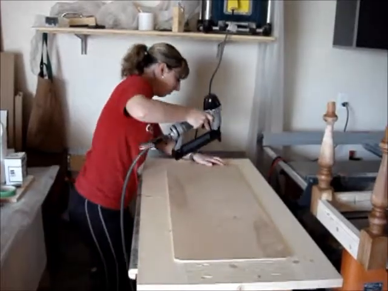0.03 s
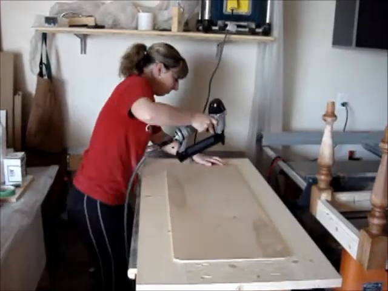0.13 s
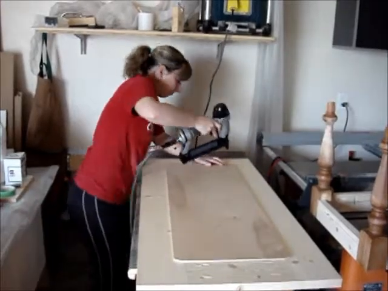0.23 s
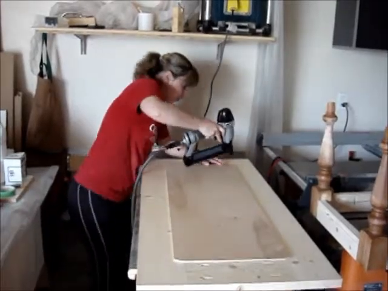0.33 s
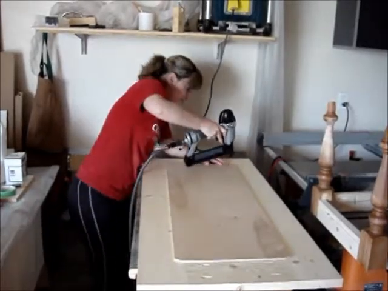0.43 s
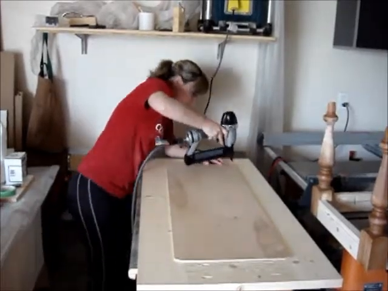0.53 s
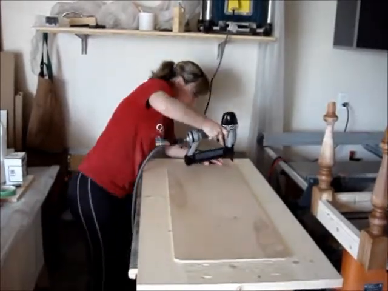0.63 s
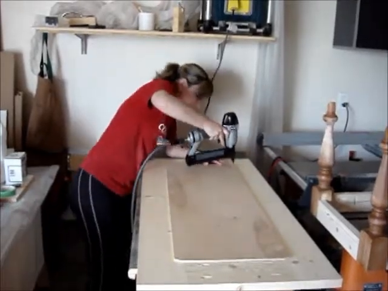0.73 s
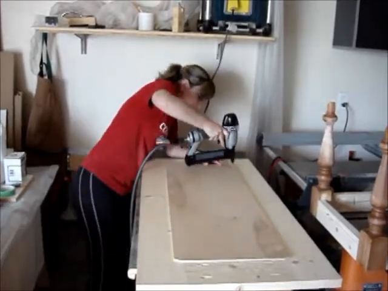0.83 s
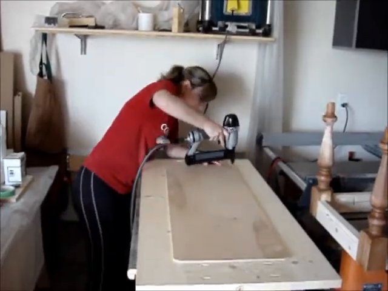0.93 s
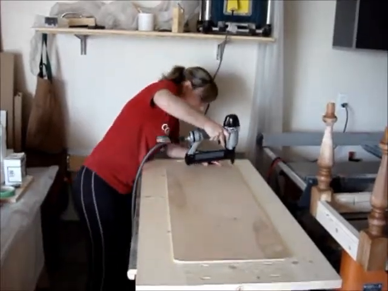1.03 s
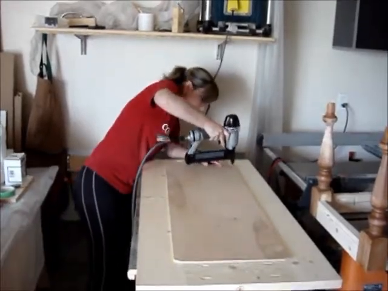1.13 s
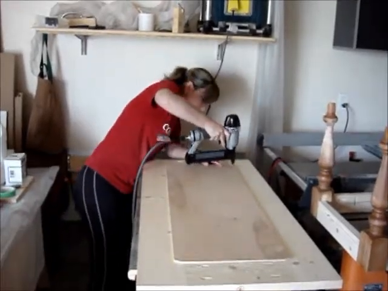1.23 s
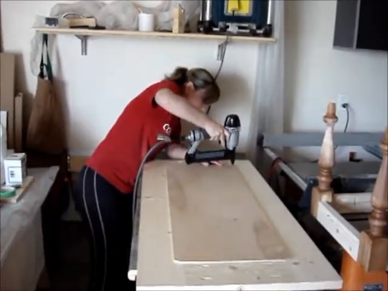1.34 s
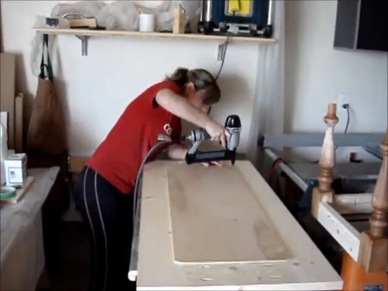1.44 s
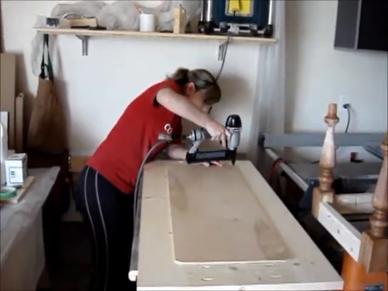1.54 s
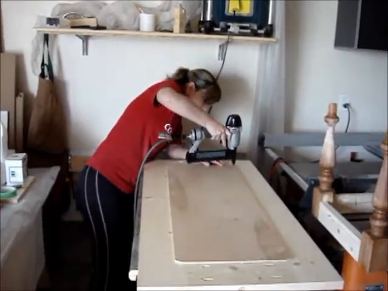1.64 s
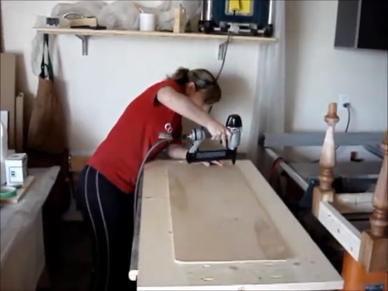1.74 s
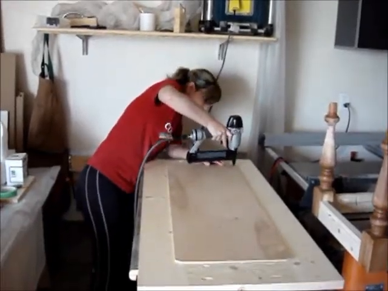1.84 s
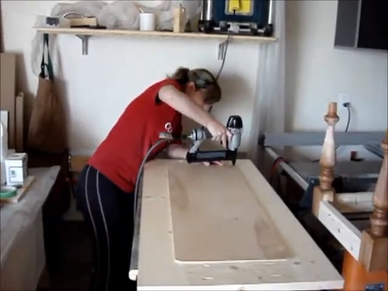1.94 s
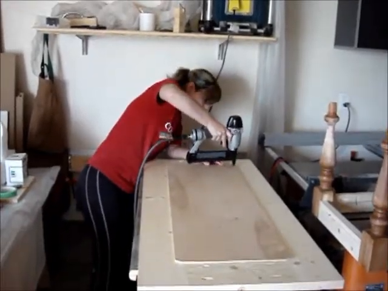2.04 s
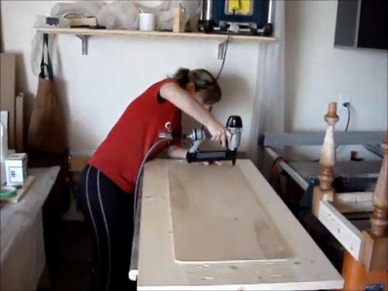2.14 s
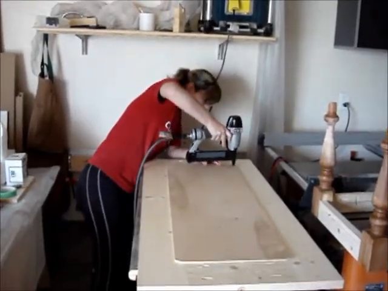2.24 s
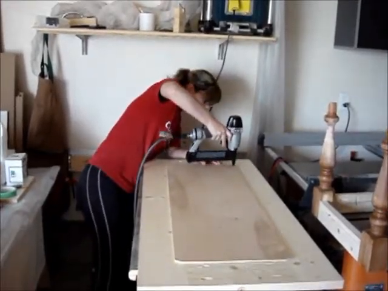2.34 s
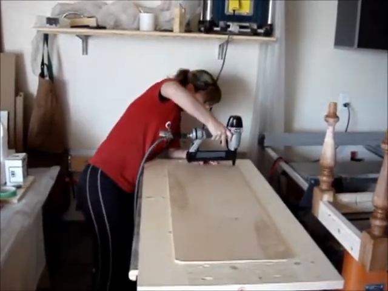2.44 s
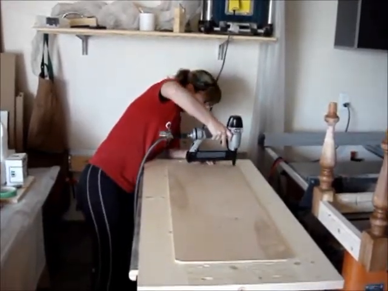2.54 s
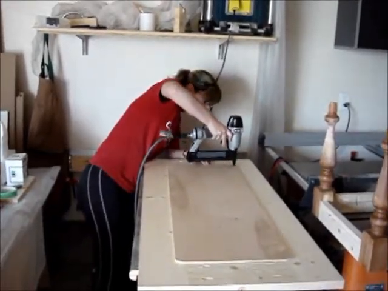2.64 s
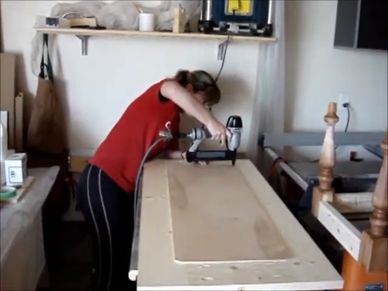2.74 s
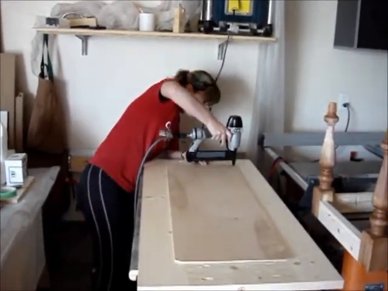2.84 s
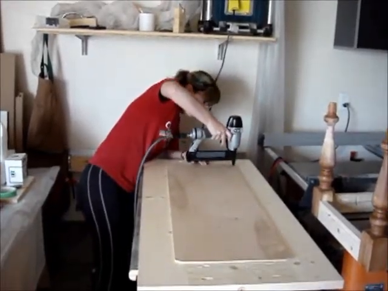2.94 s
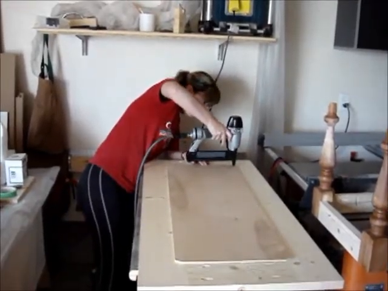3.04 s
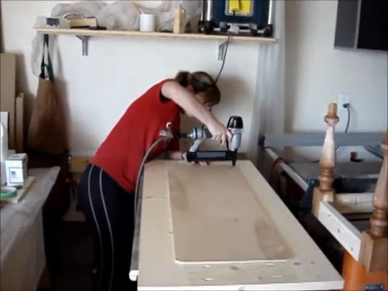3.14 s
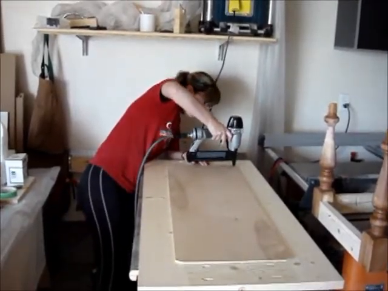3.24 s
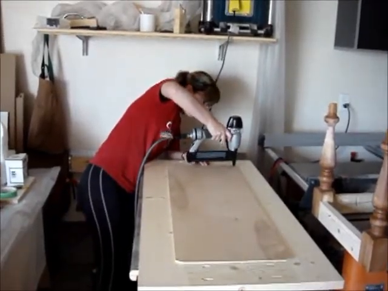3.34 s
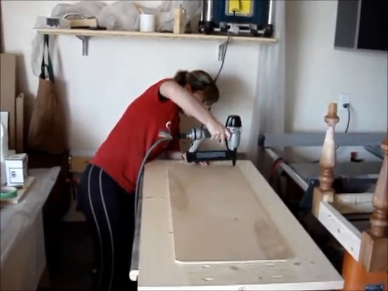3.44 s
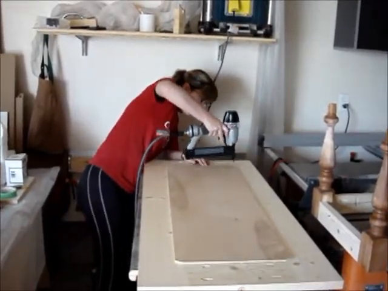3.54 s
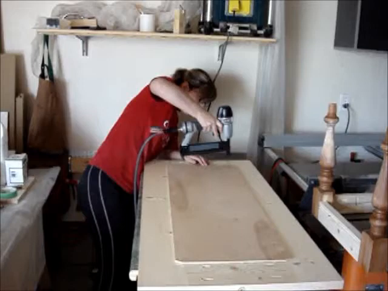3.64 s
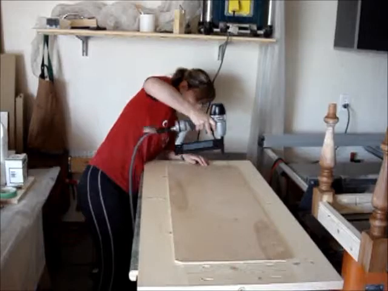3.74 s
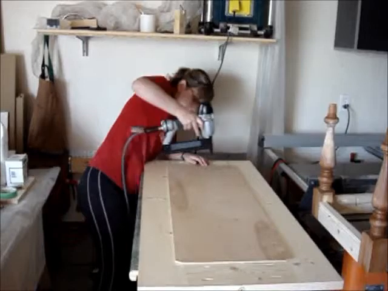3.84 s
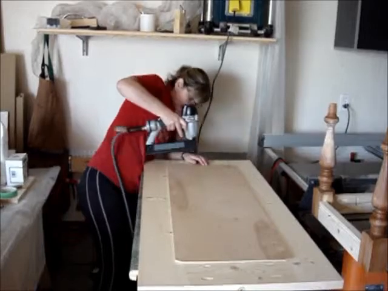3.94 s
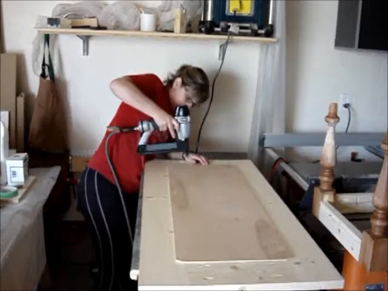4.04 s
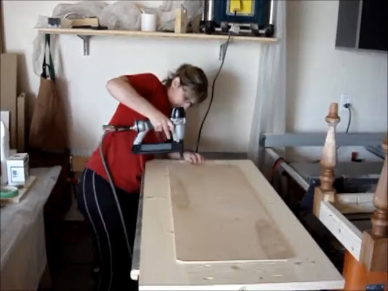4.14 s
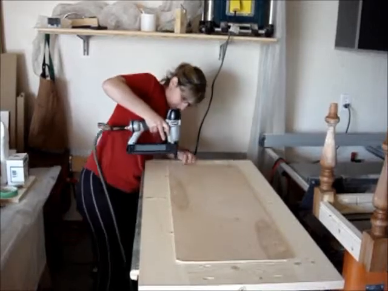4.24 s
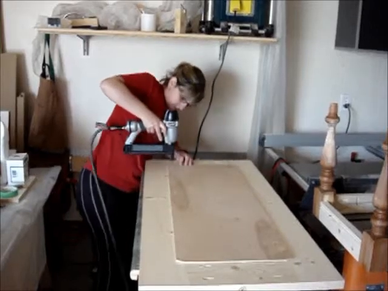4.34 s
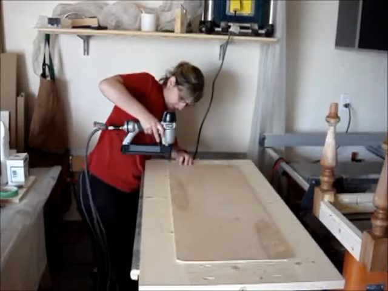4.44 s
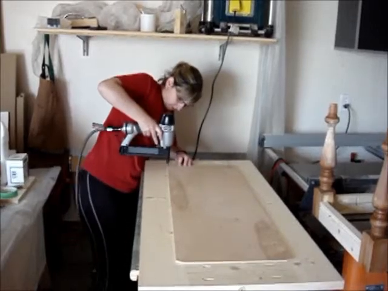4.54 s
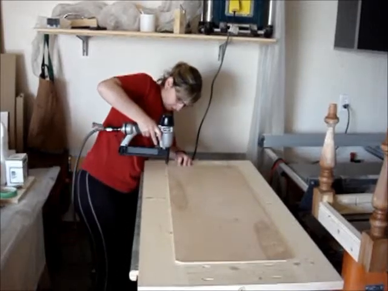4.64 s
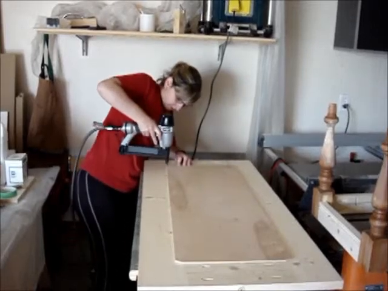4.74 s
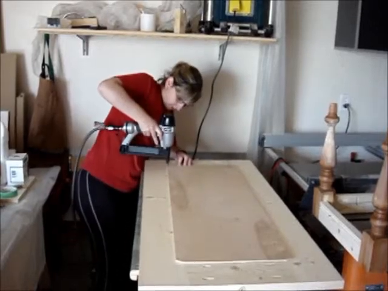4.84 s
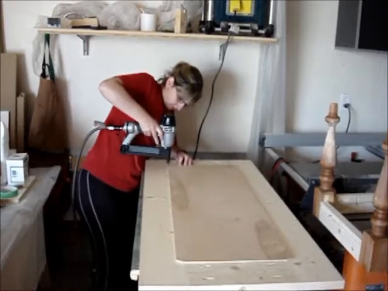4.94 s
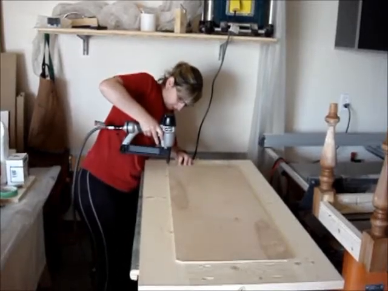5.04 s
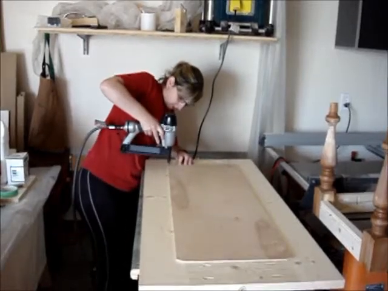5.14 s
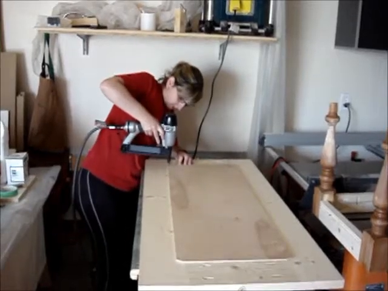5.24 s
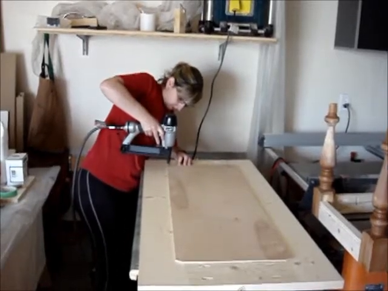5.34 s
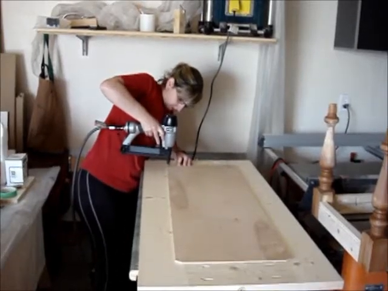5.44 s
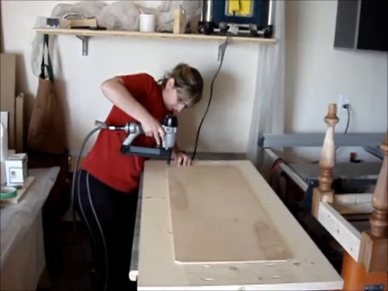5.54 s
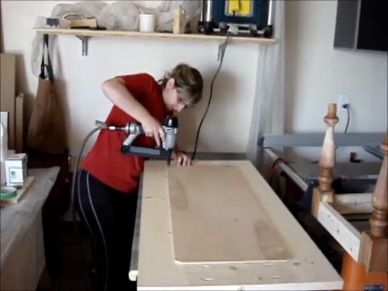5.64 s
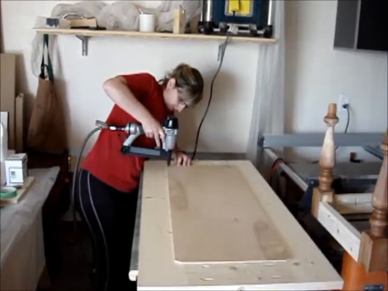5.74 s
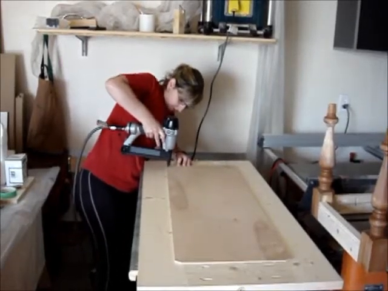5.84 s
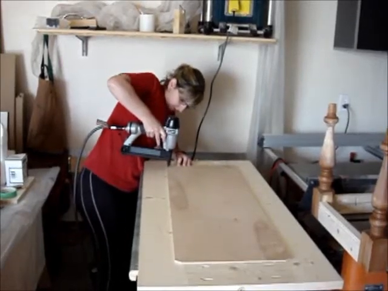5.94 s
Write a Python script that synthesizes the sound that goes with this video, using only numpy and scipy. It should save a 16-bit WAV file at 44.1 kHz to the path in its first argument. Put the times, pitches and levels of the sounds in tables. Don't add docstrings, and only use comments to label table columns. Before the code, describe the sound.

In a bare workshop, a hand and pneumatic stapler drag, knock and clack over a wooden board, with brief skin squeaks and hose hums. After a quiet moment, a puff of air leads into one huge cracking shot, with a short exhaust burst and room ring. Faint handling and small knocks follow over low machine hum. A small camera overloads slightly on the bang.

```python
import sys
import numpy as np
from scipy import signal
from scipy.io import wavfile
from scipy.ndimage import uniform_filter1d, minimum_filter1d

SR = 44100
rng = np.random.default_rng(int(sys.argv[2]) if len(sys.argv) > 2 else 0)


def undo_db(level):
    steps = np.asarray(level, float) / 20
    return 10 ** steps


def master_out(mix):
    frames = np.transpose(np.atleast_2d(mix))
    ceiling = np.clip(frames, -1, 1)
    pcm = np.round(ceiling * 32767).astype(np.int16)
    wavfile.write(sys.argv[1], SR, pcm)


N = 264326

# freq_hz, level_db (per Hz)
HUM_COLOUR = [(12, -63), (20, -28), (43, -20.5), (63, -3), (130, -0.5), (178, -16), (213, -2), (419, -5),
              (824, 1), (1100, -2.5), (4350, -21.5), (7510, -20), (10000, -25.5), (13000, -97),
              (22000, -120)]
# peak_s, level_db, rise_s, fall_s
FOCUS_RUNS = [
    (4.027, -55, .05, .02),
    (4.3, -68, 1.5, 1.5),
    (4.72, -57, .35, .3),
    (4.9, -60, .6, .15),
    (5.14, -57, .2, .05),
    (5.162, -50, .04, .005),
]
# freq_hz, width_hz, level_db
LENS_MODES = [(4350, 850, 0), (6050, 700, -3), (8200, 600, -16)]
# freq_hz, width_hz, level_db
WHINE = (7410, 40, -74)

# peak_s, drum_db, rustle_db, length_s
DRAGS = [(0.0, -38.5, -52.5, 0.17), (0.068, -50, -35.5, .12), (0.2, -48.5, -42.5, 0.25),
         (0.362, -44.5, -48.5, 0.22), (0.544, -51.5, -45, 0.6), (0.793, -44, -43.5, 0.35),
         (1.045, -39.5, -43.5, 0.11), (1.204, -52.5, -78, 0.35), (1.804, -61, -71, .15),
         (1.933, -44.5, -65, 0.28), (2.07, -41, -64, 0.17), (2.24, -54, -59, 0.22),
         (2.377, -49.5, -58, 0.55), (2.57, -60, -55, .2), (2.787, -75, -64, 0.47), (3.193, -68, -67, .3),
         (4.112, -74, -60.5, 0.7), (4.417, -61, -72, 0.28), (4.607, -60, -71, 0.26),
         (4.856, -55.5, -62, 0.77), (5.11, -53, -65, 0.36), (5.375, -57, -70, 0.37), (5.57, -51, -79, 0.42),
         (5.75, -52, -61.5, 0.21), (5.926, -49, -67, 0.5)]
# time_s, pitch_hz
GRIP_NOTE = [(0, 365), (.35, 316), (.65, 429), (1.2, 276), (1.92, 332), (2.15, 242), (2.45, 270),
             (2.62, 445), (4.2, 393), (4.9, 333), (5.6, 273), (5.8, 359), (5.99, 250)]
# freq_hz, width_hz, level_db
BOARD_MODES = [(139, 76, -3), (290, 129, 2.5), (501, 48, -6), (717, 100, -7), (990, 203, -7.5),
               (1558, 116, -10)]
# freq_hz, level_db (per Hz)
RUSTLE_COLOUR = [(530, -23), (900, -12.5), (1570, -6), (2460, -7), (3080, -7), (4420, -8.5), (7620, -15.5),
                 (10000, -26), (13000, -57), (22000, -120)]
# peak_s, level_db, rise_s, fall_s, centre_hz
SKIN_SLIDES = [
    (.55, -57, 0.72, 0.74, 4800),
    (.86, -39, 0.35, 0.24, 4260),
    (2.3, -55, .2, 0.4, 4670),
    (2.58, -50, 0.13, 0.26, 4670),
    (2.71, -44, 0.09, 0.13, 5050),
    (2.77, -50, 0.17, 0.047, 4930),
]
# peak_s, level_db, rise_s, fall_s, pitch_hz
SQUEAKS = [
    (.62, -60, 0.2, .2, 4410),
    (.83, -45, 0.37, 0.2, 4340),
    (2.3, -62, .1, .3, 5020),
    (2.58, -61, .1, .2, 4920),
    (2.73, -54, .1, 0.089, 5280),
]
# peak_s, level_db, rise_s, fall_s, pitch_hz
HOSE_RUBS = [
    (.26, -41, 0.035, .1, 727),
    (.34, -46, 0.065, 0.24, 730),
    (.43, -43, 0.11, .06, 715),
    (.81, -42.5, 0.28, 0.29, 760),
    (1.96, -47.5, 0.078, 0.052, 820),
    (2.288, -48, 0.11, 0.053, 667),
    (2.72, -45, 0.15, 0.2, 780),
]
# time_s, level_db, pitch_hz, contact_s
KNOCKS = [(.249, -30.5, 713, 0.02), (.347, -32.5, 325, 0.016), (0.41, -29, 543, 0.034),
          (.553, -32, 270, 0.015), (.768, -30.5, 290, 0.02), (.79, -29.5, 655, 0.073),
          (0.854, -33, 350, 0.0096), (2.02, -36.5, 255, .0091), (2.078, -34.5, 495, 0.042),
          (2.092, -33, 222, .028), (4.093, -31, 860, 0.028), (4.142, -38.5, 518, .018),
          (4.797, -38.5, 313, 0.023), (4.986, -40, 354, 0.032), (3.330, -23.5, 850, 0.0013),
          (5.739, -38.5, 350, 0.064), (5.799, -39, 350, 0.012)]
# time_s, wood_db, metal_db, click_db, wood_pitch_hz
CLACKS = [(0.546, -29.5, -53, -33.5, 960), (1.001, -35, -54, -58, 570), (1.009, -33, -25, -32, 1500),
          (1.036, -35, -25, -24.5, 606), (1.086, -37, -38, -33, 270), (1.199, -40, -35.5, -44, 228),
          (1.776, -41, -41.5, -51, 1500), (1.92, -56, -55, -42, 844), (1.928, -47, -46, -38.5, 820),
          (2.075, -32, -45, -46, 1050), (5.73, -41, -47, -41, 895), (5.868, -51, -45, -41, 900),
          (5.885, -33, -41, -52, 335), (5.911, -37, -44.5, -60, 388), (5.932, -44, -47, -60, 280)]
# freq_hz, width_hz, level_db
MAGAZINE_MODES = [(1500, 120, -7), (2070, 90, -10), (2740, 110, 0), (2910, 150, -2), (3300, 300, -10),
                  (3700, 140, -14), (4680, 140, -16)]

# time_s, level_db
AIR_FLOW = [
    (3.314, -82),
    (3.318, -37),
    (3.322, -57),
    (3.328, -28.5),
    (3.333, -18),
    (3.345, -24),
    (3.39, -29),
    (3.47, -14),
    (3.5, -70),
]
# freq_hz, level_db (per Hz)
AIR_COLOUR = [(530, -53), (900, -31), (995, -16), (1400, -5.5), (1970, -6.5), (2650, 3.5), (3510, 2.5),
              (3960, -0.5), (4790, 1.5), (7390, 3), (10000, -2.5), (13000, -59), (22000, -120)]
# time_s, level_db
BLOWS = [
    (3.3898, -13),
    (3.3908, 1),
    (3.3926, -6),
    (3.3983, -2),
    (3.413, -5.5),
    (3.4226, -11),
    (3.428, -13),
]
# freq_hz, level_db (per Hz)
BLOW_COLOUR = [(35, -56), (60, -31), (151, -17.5), (239, -6), (283, -12), (404, -7), (440, -14.5),
               (509, -1), (577, -5), (1060, -0.5), (1310, -5), (2560, 2), (3970, -8.5), (4320, -8.5),
               (9000, -15), (11700, -41), (19800, -120)]
# freq_hz, width_hz, level_db
STRUCK_MODES = [(500, 25, 0), (907, 38, 13.5), (1050, 110, 11.5), (1500, 72, 13.5), (2030, 44, -22),
                (2630, 58, -2), (2890, 40, 8), (3920, 140, -9.5), (4800, 260, 8)]

# freq_hz, t60_s
ROOM_DECAY = [(60, 0.15), (130, 0.75), (250, 0.55), (700, 0.65), (1400, 0.76), (2500, 0.64), (5000, 0.64),
              (8000, 0.49), (11000, 0.36)]
# delay_s, level_db
WALLS = [
    (.0065, -9),
    (.0195, -8),
    (.030, -8),
    (.0375, -10),
    (.058, -14),
    (.081, -15),
    (.112, -19),
]

# time_s, jump_fullscale, settling_s
JUMPS = [
    (3.334, 0.037, 0.031),
    (3.389, -0.05, 0.028),
]
# time_s, steps_made
GAIN_STEPS = [
    (3.575, 0),
    (3.74, 5),
    (3.895, 9),
    (3.993, 11),
    (4.065, 12),
    (4.31, 12),
    (4.94, 28),
]
# time_s, offset_fullscale
DRIFT = [
    (3.45, 0),
    (3.51, .003),
    (3.6, .001),
    (4.0, .0002),
    (4.3, 0),
    (4.5, -.003),
    (4.9, -.003),
    (5.0, 0),
]
# peak_s, level_db, rise_s, fall_s
TABLE_BUMPS = [
    (.65, -53, 0.078, 0.033),
    (.85, -62, .1, 0.092),
]

BOARD_BAND = signal.butter(2, [110, 1500], "band", fs=SR, output="sos")


def evened(x):
    return x / np.sqrt(np.mean(x ** 2) + 1e-20)


def read(points, hz):
    f, value = np.transpose(points)
    return np.interp(np.log(hz + 1), np.log(f + 1), value)


def add(mix, s, sound):
    part = mix[round(s * SR):][:len(sound)]
    part += sound[:len(part)]


def swells(rows):
    s, db, rise, fall = np.transpose(rows)[:4, :, None]
    late = np.arange(0, N, 32) / SR - s
    lateness = np.maximum(-late / np.maximum(rise, 1e-3), late / np.maximum(fall, 1e-3))
    gain = undo_db(db - 20 * lateness)
    return np.repeat(np.sqrt((gain ** 2).sum(0)), 32)[:N]


def glide(rows):
    return np.interp(np.arange(N) / SR, *np.transpose(rows)[[0, -1]])


def resonate(x, hz, width):
    turn = np.exp(2j * np.pi * np.cumsum(hz * np.ones(len(x))) / SR)
    r = np.exp(-np.pi * width / SR)
    smooth = signal.lfilter([1 - r], [1, -r], x / turn + 1e-18)
    return 2 * (turn * smooth).real


def body(x, modes):
    return sum((-1) ** k * undo_db(db) * resonate(x, hz, width) for k, (hz, width, db) in enumerate(modes))


def colour(x, spectrum):
    half = np.log(undo_db(read(spectrum, np.fft.rfftfreq(4096, 1 / SR))))
    log_gain = np.r_[half, half[-2:0:-1]]
    phase = signal.hilbert(log_gain).imag
    taps = np.fft.ifft(np.exp(log_gain - 1j * phase)).real[:2048]
    return signal.oaconvolve(x, taps)[:len(x)]


def gritty(grain_db, size):
    flicker = evened(uniform_filter1d(rng.standard_normal(N), size))
    return rng.standard_normal(N) * undo_db(grain_db * flicker)


def hum():
    hz = np.fft.rfftfreq(1024, 1 / SR)
    a, b, patches = rng.standard_normal((N // 256 + 5, 513, 3)).T
    patches = evened(uniform_filter1d(uniform_filter1d(patches, 10, 0), 12, 1))
    z = (a + 1j * b) * undo_db(read(HUM_COLOUR, hz)[:, None] + 1.2 * patches)
    return undo_db(-50.5) * evened(signal.istft(z, nperseg=1024, noverlap=768)[1][:N])


def focus():
    first_s, ticks_per_s = 4.6932, 59.93
    count = np.floor((np.arange(N) / SR - first_s) * ticks_per_s)
    steps = np.diff(count, prepend=0) > 0
    jolts = steps * rng.uniform(.7, 1.3, N)
    ticks = sum(undo_db(db) * resonate(resonate(jolts, hz, width), hz, width) for hz, width, db in LENS_MODES)
    hz, width, db = WHINE
    whine = undo_db(db) * evened(resonate(rng.standard_normal(N), hz, width))
    return evened(ticks) * swells(FOCUS_RUNS) + whine


def drumming():
    chatter = gritty(1.3, size=200)
    note = evened(resonate(chatter, glide(GRIP_NOTE), 114))
    board = evened(body(chatter, BOARD_MODES))
    drum = evened(signal.sosfilt(BOARD_BAND, board + undo_db(-2.0) * note))
    strokes = swells([(s, db, 0.35 * length, length) for s, db, _, length in DRAGS])
    return drum * (undo_db(-63.5) + strokes)


def rustling():
    rustle = evened(colour(gritty(1.7, size=60), RUSTLE_COLOUR))
    strokes = swells([(s, db + 1.5, 0.35 * length, length) for s, _, db, length in DRAGS])
    return rustle * (undo_db(-63) + strokes)


def skin():
    grit = gritty(0.97, size=120)
    pitch_hz, centre_hz = glide(SQUEAKS), 1.027 * glide(SKIN_SLIDES)
    squeak = evened(resonate(resonate(grit, pitch_hz, 300), pitch_hz, 300))
    hiss = evened(resonate(resonate(grit, centre_hz, 2200), centre_hz, 1600))
    return squeak * swells(SQUEAKS) + hiss * swells(SKIN_SLIDES)


def hose():
    hz = glide(HOSE_RUBS)
    note = resonate(resonate(gritty(0.55, size=300), hz, 160), hz, 160)
    return evened(note) * swells(HOSE_RUBS)


def knocks():
    out, t = np.zeros(N), np.arange(6000) / SR
    touches = [(*row, 0.013) for row in CLACKS]
    for s, db, hz, contact_s in KNOCKS:
        click_db = db - 10 - 300 * contact_s
        touches.append((s, db, db - 23, click_db, hz, contact_s))
    for s, wood_db, metal_db, click_db, hz, contact_s in touches:
        contact = rng.standard_normal(len(t)) * np.exp(-t / contact_s)
        wood = signal.sosfilt(BOARD_BAND, resonate(contact, hz, 100) + .5 * body(contact, BOARD_MODES))
        metal = body(contact, MAGAZINE_MODES)
        click = colour(contact, RUSTLE_COLOUR)
        parts = [(wood_db, wood), (metal_db, metal), (click_db, click)]
        add(out, s, sum(undo_db(db) * part / abs(part).max() for db, part in parts))
    return out


def air():
    flow_db = np.interp(np.arange(N) / SR, *np.transpose(AIR_FLOW), -120, -120)
    return evened(colour(gritty(1.5, size=40), AIR_COLOUR)) * undo_db(flow_db)


def blow():
    force, t = np.zeros(N), np.arange(1500) / SR
    for s, db in BLOWS:
        add(force, s, undo_db(db) * rng.standard_normal(len(t)) * np.exp(-t / 0.0016))
    crack = colour(force, BLOW_COLOUR)
    return undo_db(16.0) * (crack + body(crack, STRUCK_MODES))


def slam():
    bang = np.zeros(N)
    add(bang, BLOWS[1][0], np.ones(1))
    return colour(bang, BLOW_COLOUR)


def room(x):
    taps = np.zeros(SR)
    at = np.arange(130, SR - 10, 10) + rng.integers(0, 10, (SR - 131) // 10)
    taps[at] = rng.choice([-1., 1.], len(at))
    hz, t, z = signal.stft(taps, SR, nperseg=256)
    decay = undo_db(-60 * t / read(ROOM_DECAY, hz)[:, None])
    tail = signal.istft(z * decay, SR, nperseg=256)[1]
    tail = tail / np.linalg.norm(tail)
    for s, db in WALLS:
        add(tail, s, undo_db([db - 8.5]))
    return signal.fftconvolve(x, tail)[:N]


def scene():
    tool = knocks()
    near = tool + drumming() + rustling() + skin() + hose() + air() + blow()
    far = undo_db(2.5) * air() + undo_db(41.0) * slam() + undo_db(-11) * tool
    return (near + room(far) + hum() + focus())[None]


def ducked(dry):
    power_db = 10 * np.log10(abs(uniform_filter1d(dry[0] ** 2, 300)) + 1e-12)
    fall = 22.0 * np.arange(N) / SR
    held_db = np.maximum.accumulate(power_db + fall) - fall
    over_db = np.maximum(held_db + 20, 0)
    return dry / undo_db(0.43 * uniform_filter1d(over_db, 200)) + undo_db(-65.5) * rng.standard_normal(N)


def creep():
    t = np.arange(N) / SR
    steps = np.interp(t, *np.transpose(GAIN_STEPS))
    since_s = steps % 1 / np.maximum(np.gradient(steps) * SR, 1)
    climb = .036 * uniform_filter1d(since_s, size=150)
    return climb + np.interp(t, *np.transpose(DRIFT))


def input_offset():
    late = [np.arange(N) / SR - s for s, _, _ in JUMPS]
    jumps = sum(jump * np.exp(-np.maximum(t, 0) / settle) * np.clip(t / 0.0009, 0, 1)
                for t, (_, jump, settle) in zip(late, JUMPS))
    bumps = evened(resonate(rng.standard_normal(N), 25, 5.2)) * swells(TABLE_BUMPS)
    return jumps + creep() + bumps


def masked(x):
    hz, _, z = signal.stft(x, SR, "cosine", nperseg=512, noverlap=256)
    band = np.arange(len(hz)) // 5
    power = np.add.reduceat(abs(z) ** 2, np.arange(0, len(hz), 5), axis=0)
    nearby = -minimum_filter1d(-power, size=5, axis=1)
    strong = power > nearby * undo_db(-2 * 8)
    keep = strong[band] | (hz < 4200)[:, None]
    return signal.istft(z * keep, SR, "cosine", nperseg=512, noverlap=256)[1][:N]


def top_cut(x):
    return signal.sosfilt(signal.butter(12, 11320, fs=SR, output="sos"), x)


def record(dry):
    x = .96 * np.tanh((ducked(dry) + input_offset()) / .96)
    low_pass = signal.firwin(511, 10220, window=("kaiser", 9), fs=SR)
    mix = signal.oaconvolve(masked(x[0])[None], low_pass[None], "same")
    return top_cut(mix)


dry = scene()
out = record(dry)
master_out(out)
```